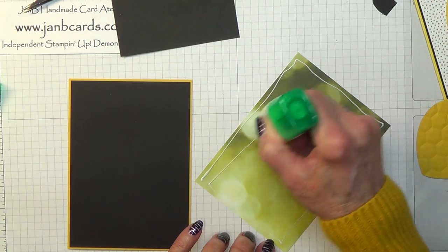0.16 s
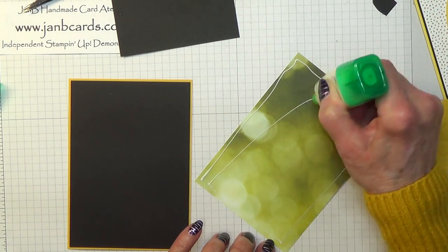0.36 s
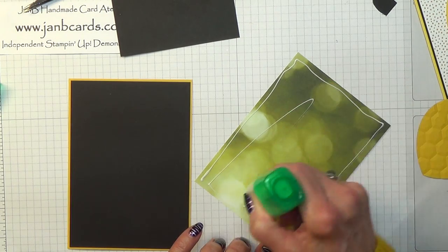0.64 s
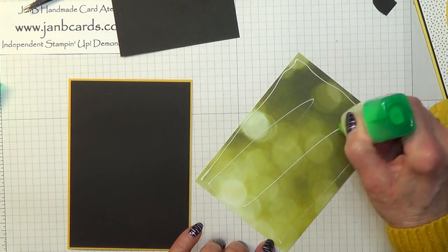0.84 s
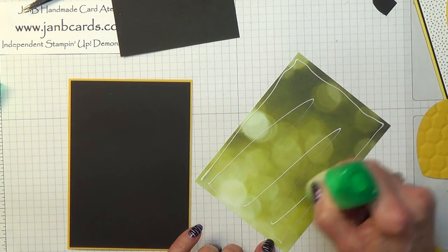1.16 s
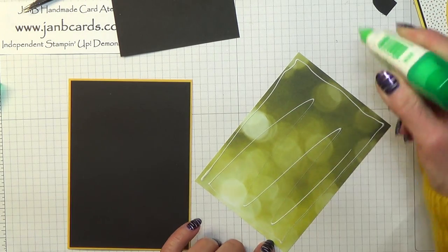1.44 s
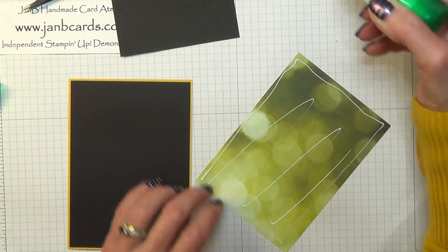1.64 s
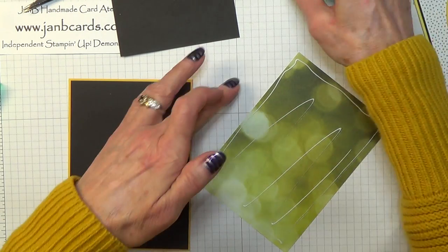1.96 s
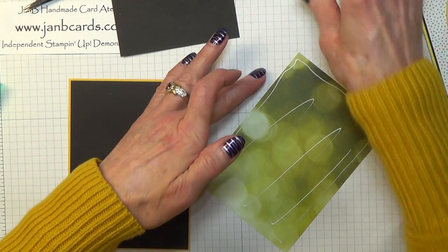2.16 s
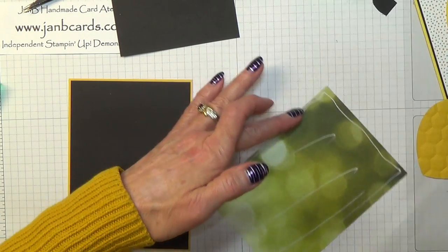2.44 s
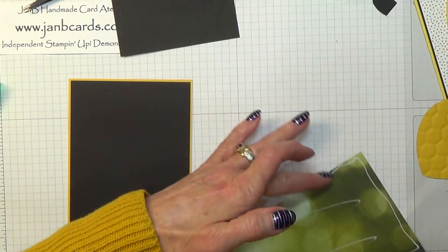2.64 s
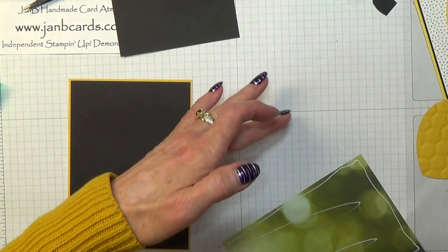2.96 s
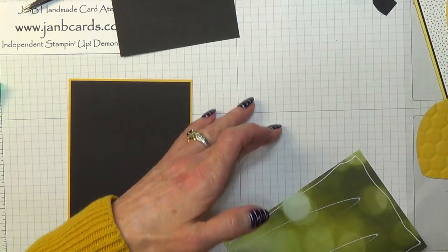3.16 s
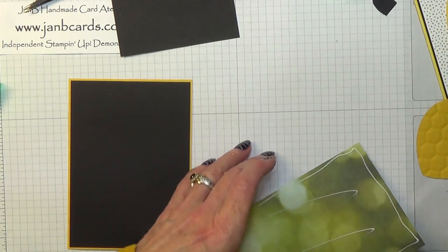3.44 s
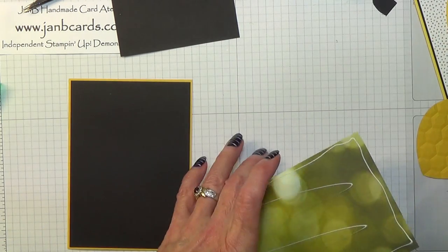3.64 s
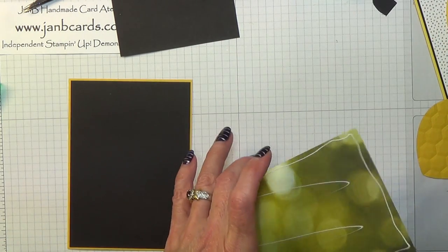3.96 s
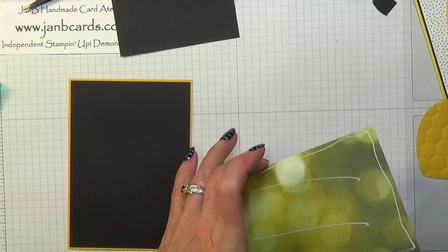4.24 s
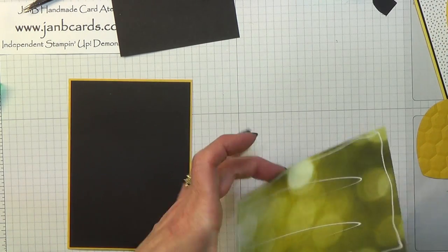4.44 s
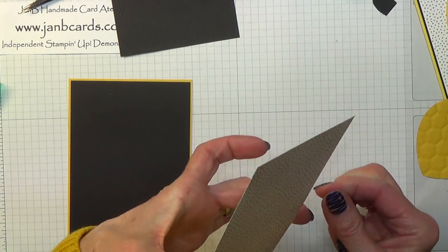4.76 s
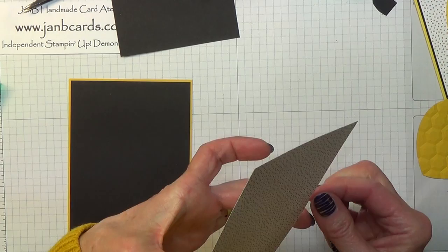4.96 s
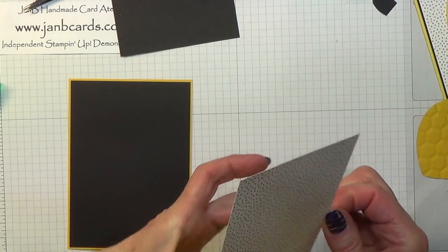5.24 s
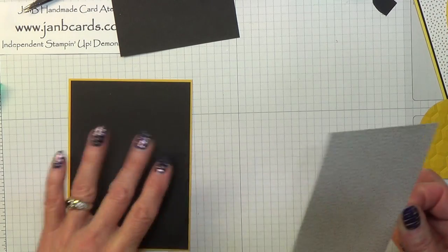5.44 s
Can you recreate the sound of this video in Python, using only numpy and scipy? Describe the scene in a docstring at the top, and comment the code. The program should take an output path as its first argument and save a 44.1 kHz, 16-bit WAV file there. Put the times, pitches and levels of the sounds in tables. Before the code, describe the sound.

A glue bottle nozzle scratches over card in five short strokes, then ticks, a sharp knock with a weaker bounce, and a hissing card slide.

```python
"""A glue bottle's nozzle is drawn over card in five strokes: tiny slips ring the bottle and rumble the table.
Light ticks follow, and a sharp knock with a weaker one after it is the bottle set down and rocking once.
The card then slides off the mat as hissing friction; short brushes and ticks are fingers and card edges.
A small room adds decaying reflections. The camera adds steady hiss, with mains hum and a faint pulsing whine."""
import sys
import numpy as np
from scipy import signal
from scipy.fft import rfft, irfft
from scipy.io import wavfile
from scipy.ndimage import uniform_filter1d

SR = 44100
rng = np.random.default_rng(int(sys.argv[2]) if len(sys.argv) > 2 else 0)


def inscribe(sig):
    """Save sig as 16-bit PCM at rate SR to the path in sys.argv[1].

    A 1-D sig is mono; a 2-D sig holds one channel per row.
    Samples are clipped to [-1, 1] before scaling.
    """
    pcm = np.round(np.clip(np.atleast_2d(sig).T, -1, 1) * 32767)
    wavfile.write(sys.argv[1], SR, pcm.astype(np.int16))


N = 246519
T = np.arange(N) / SR  # time of every sample, in seconds

# Nozzle strokes; the tip's angle favours one pitch in each:
# (start [s], speeding up [s], steady [s], slowing [s], base level [dB], extra table rumble [dB],
#  favoured pitch [Hz], pitch width [Hz], pitch against bottle ring [dB])
NOZZLE_STROKES = [(0.03, 0.13, 0.13, .13, -62, 3.5, 1900, 800, -17),
                  (0.43, 0.088, 0.022, 0.14, -53.5, 3.5, 2400, 330, -3.5),
                  (0.748, 0.027, 0.041, .11, -50.5, -2, 2200, 500, -2.5),
                  (0.919, 0.13, 0.02, 0.064, -51, 0.5, 3550, 650, -12),
                  (1.139, .13, 0.013, 0.026, -45.5, -2.5, 3660, 580, -3)]
# One push of the card over the mat: (start [s], speeding up [s], steady [s], slowing [s])
CARD_PUSH = (2.247, .2, 0.21, 0.098)
# Fingers and card edges brushing: (start [s], length [s], level before fading and room [dB], centre [Hz])
BRUSH_EVENTS = [(0.703, 0.033, -54.5, 12400), (1.373, 0.33, -59, 9900), (1.46, .024, -56, 11000),
                (2.212, 0.074, -63.5, 11000), (3.127, 0.094, -62.5, 9900), (3.27, 0.25, -66, 9000),
                (3.282, 0.25, -66.5, 2740), (3.528, .06, -65, 7000), (3.881, 0.056, -57.5, 6900),
                (3.93, 0.073, -63, 6000), (4.18, 0.083, -63.5, 2400), (4.267, 0.053, -62.5, 4470),
                (4.302, 0.031, -59.5, 1360), (5.303, 0.058, -61, 4170), (5.308, 0.057, -53, 9400)]
# Ticks of nails, plastic and card edges, and the sharp onsets of the bottle's knock and its bounce:
# (time [s], level before decay and room [dB], centre [Hz], time to fade by 60 dB [s])
TICK_EVENTS = [(0.748, -45.5, 10800, 0.054), (1.296, -39.5, 9000, 0.015), (1.451, -42, 11000, 0.021),
               (1.4512, -40, 1670, 0.0073), (1.4606, -30, 10000, 0.012), (1.493, -36, 10000, 0.011),
               (1.4993, -28, 9800, 0.0098), (1.5347, -25, 10900, 0.0079), (1.5663, -30.5, 9700, 0.0094),
               (1.5668, -35.5, 4350, 0.012), (1.75, -37.5, 4470, 0.0061), (2.0294, -23.5, 9400, 0.0023),
               (2.0934, -36.5, 5170, 0.011), (2.0934, -34, 1260, 0.011), (2.2205, -44.5, 12000, 0.01),
               (2.3061, -30, 9700, 0.0058), (3.772, -53, 2500, 0.012), (5.2431, -43.5, 10400, 0.033)]
# Blows on the table: (time [s], bottle ring gain [dB], table ring gain [dB], contact time [ms])
TABLE_BLOWS = [(1.075, -0.5, -5, 2.3), (1.097, -21, -8.5, 2.16), (2.0295, 6, 4.5, 0.068),
               (2.0921, -16, 5, 3.03), (5.25, -19, -16.5, 1.8)]
# Ringing of the bottle and the spot it lands on:
# (pitch [Hz], relative level [dB], time to fade by 60 dB [s])
BOTTLE_MODES = [(514, -22.5, 0.0098), (1360, -29, 0.021), (1900, -59, 0.0098), (3190, -15.5, 0.0087),
                (3610, -13, 0.0051), (4500, -17, 0.0044), (5200, -26, 0.0077), (6330, -23, 0.0069),
                (11100, -52, .004)]
# Ringing of the table top: (pitch [Hz], relative level [dB], time to fade by 60 dB [s])
TABLE_MODES = [(157, -46, 0.28), (205, -49, 0.26), (246, -55, 0.24), (250, -34, 0.038), (330, -38.5, 0.15),
               (400, -36, 0.13), (477, -32.5, 0.028), (572, -41, 0.11), (635, -40.5, 0.13),
               (817, -41.5, 0.07), (1270, -43, .12), (2470, -61, 0.11)]
# Nozzle and bottle resonances under friction: (centre [Hz], width [Hz], relative level [dB])
NOZZLE_RESONANCES = [(920, 480, -26), (1354, 65, 3.5), (1790, 210, -2.5), (2090, 250, -0.5),
                     (2740, 430, -3), (3660, 430, 1), (4870, 1900, -9.5)]

# Tone of the table's rumble under the nozzle: (frequency [Hz], relative level [dB])
RUMBLE_TONE = [(100, -26), (150, -8.5), (195, 5), (260, -2.5), (310, -8.5), (420, 2.5), (505, -8),
               (570, -2), (680, -7.5), (900, -13.5), (1300, -8.5), (3000, -44)]
# Tone of the card fibres' hiss under the nozzle: (frequency [Hz], relative level [dB])
FIBRE_TONE = [(3000, -15), (5500, 8), (7500, 7), (10000, 5.5), (13000, -1), (16000, -19)]
# Tone of the card's hiss on the mat: (frequency [Hz], relative level [dB])
CARD_TONE = [(2500, -18.5), (5000, -22), (7000, 3.5), (9000, 3), (12000, 2), (14000, -5), (16000, -15)]
# Tone of the card's rasp on the mat: (frequency [Hz], relative level [dB])
RASP_TONE = [(500, -29), (2000, -16), (3700, 3.5), (4600, -1), (6000, 5.5), (7500, -4), (10000, -18)]
# Tone of the room's reflections: (frequency [Hz], relative level [dB])
ROOM_TONE = [(100, 10), (200, 6), (450, 6), (750, 10.5), (920, 17), (1100, 11), (1300, -1), (1750, 13),
             (2500, 10), (3200, -2), (5000, -0.5), (9000, -4), (16000, 1)]
# Tone of the steady hiss: (frequency [Hz], relative level [dB])
HISS_TONE = [(25, -12), (45, -13), (70, -3.5), (120, 0.5), (250, 1.5), (450, -2.5), (650, -4), (1150, -5.5),
             (1420, -0.5), (1750, -7), (4000, -9.5), (8000, -12), (12500, -12.5), (16000, -16.5)]
# Mains hum, before it is leaned to one side: (pitch [Hz], rms level [dB])
HUM_TONES = [(50, -76), (100, -66.5), (150, -75.5), (200, -69), (250, -78.5), (300, -84), (400, -83.5),
             (500, -84)]
# Stereo width of the diffuse sound, nearly mono at the very top: (frequency [Hz], side gain [dB])
STEREO_WIDTH = [(60, 6), (200, -8), (400, -8), (700, -10), (1300, -12.5), (2400, -16.5), (4400, -20),
                (8100, -6), (15000, -28)]

# Each layer's amplitude is the rubbing speed raised to its own power
SCRATCH_POWER, RUMBLE_POWER, FIBRE_POWER, CARD_POWER, RASP_POWER = 1.3, 0.72, 0.98, 1.76, 0.77
BRIGHTEN_DB = 3  # rise of the fibre hiss from the start of a stroke to its end
# The sliding card's edge catches once: it presses harder and sings
CATCH_S, CATCH_WIDTH_S, CATCH_DB = 2.601, 0.025, 3
SING_HZ, SING_WIDTH_HZ = 6240, 1600
HISS_DB = -59.5
TOP_HZ = 15900  # the camera passes little above this


def undb(db):
    """Turn decibels into a gain."""
    return 10 ** (np.asarray(db) / 20)


def unit(x):
    """Scale a sound to an rms level of 1."""
    return x / np.sqrt(np.mean(x ** 2))


def add(track, start_s, sound):
    """Mix a sound into a track at a given time."""
    i = int(start_s * SR)
    track[i:i + len(sound)] += sound[:N - i]


def colour(x, tone):
    """Shape a sound's spectrum through (Hz, dB) points, joined along a log pitch scale."""
    hz, db = np.transpose(tone)
    f = np.fft.rfftfreq(x.shape[-1], 1 / SR)
    gain = undb(np.interp(np.log(f + 1), np.log(hz), db))
    return irfft(rfft(x) * gain, x.shape[-1])


def resonate(x, hz, width):
    """Let one resonance ring, with gain 1 at its centre."""
    hz = min(hz, 0.45 * SR)
    sharpness = hz / min(width, SR / 3)
    b, a = signal.iirpeak(hz, sharpness, SR)
    return signal.lfilter(b, a, x)


def fade(t, t60):
    """A natural decay that falls by 60 dB in t60 seconds."""
    return np.exp(-np.log(1000) * t / t60)


def spread(mid, side):
    """Make diffuse sound stereo: the mid is alike in both channels, the shaped side is opposed."""
    side = colour(side, STEREO_WIDTH)
    return mid + np.array([side, -side])


def pan(x, left_db):
    """Make the left channel louder than the right by left_db."""
    return x * undb(np.array([[left_db], [-left_db]]) / 2)


def room(x, wet_db, t60, side_db, first_s=0.00146):
    """Table and near walls send back dense reflections: fading noise that starts after first_s."""
    t = T[:SR // 2]
    tail = colour(rng.standard_normal((2, len(t))), ROOM_TONE) * fade(t, t60) * (t > first_s)
    mid, side = (signal.fftconvolve(x, echo / np.linalg.norm(echo))[:N] for echo in tail)
    return x + undb(wet_db) * spread(mid, undb(side_db) * side)


def steady_hiss():
    """The camera's own hiss: shaped random noise in both channels."""
    mid, side = (unit(colour(noise, HISS_TONE)) for noise in rng.standard_normal((2, N)))
    return undb(HISS_DB) * spread(mid, side)


def mains_hum():
    """Mains hum: steady sine tones at multiples of 50 Hz."""
    hum = np.zeros(N)
    for hz, db in HUM_TONES:
        hum += np.sqrt(2) * undb(db) * np.sin(2 * np.pi * (hz * T + rng.random()))
    return pan(hum, left_db=-3.5)


def whine(hz=2650, scatter=0.024, db=-68, first_s=0.0367, pulse_s=0.0053):
    """A faint electronic pip 25 times a second, each at a slightly different pitch."""
    period = 1 / 25
    # number of the pip and time within its period; pips peak mid-period, one of them at first_s
    pip, since = np.divmod(T - first_s + 3 * period / 2, period)
    pip_pitch = hz * (1 + scatter * rng.standard_normal(int(pip[-1]) + 1))
    pitch = pip_pitch[pip.astype(int)]
    swell = np.exp(-((since - period / 2) / pulse_s) ** 2)
    return undb(db) * swell * np.sqrt(2) * np.sin(2 * np.pi * pitch * since)


def background():
    """Steady hiss, mains hum and the pulsing whine together."""
    return steady_hiss() + mains_hum() + whine()


def friction(rate, spread_db):
    """Fibres catch and let go: tiny slips of uneven size, on average rate of them a second."""
    slips = rng.random(N) < rate / SR
    direction = rng.choice([-1, 1], N)
    return unit(slips * direction * undb(spread_db * rng.standard_normal(N)))


def speed(start, attack, hold, release):
    """A hand movement from 0 to 1 and back: it speeds up, holds and slows."""
    return np.interp(T, start + np.cumsum([0, attack, hold, release]), [0, 1, 1, 0])


def drag(depth_db):
    """The grip on paper wavers from moment to moment: a smoothed random gain."""
    wander = rng.standard_normal(N)
    for _ in range(2):
        wander = uniform_filter1d(wander, size=500)
    return undb(depth_db * unit(wander))


def brushes(width_share=0.65):
    """Skin on card: short swells of friction, each in a band whose width is a share of its centre."""
    out, slips = np.zeros(N), friction(rate=8000, spread_db=4)
    for start, length, db, hz in BRUSH_EVENTS:
        rub = slips[int(start * SR):][:int(length * SR)]
        swell = signal.windows.tukey(len(rub), 0.6)
        add(out, start, undb(db) * unit(resonate(rub, hz, width_share * hz)) * swell)
    return out


def ticks(width_share=0.45):
    """Hard contacts and knock onsets: quickly fading cracks in bands whose width is a share of the centre."""
    out, t = np.zeros(N), T[:SR // 10]
    for start, db, hz, t60 in TICK_EVENTS:
        crack = unit(resonate(rng.choice([-1., 1.], len(t)), hz, width_share * hz))
        add(out, start, undb(db) * crack * fade(t, t60))
    return out


def slide(hiss_db=-46.0, rasp_db=-58.0, sing_db=-48.5, snag_db=-57, uneven_db=1.0):
    """The card hisses and rasps over the mat with tiny snags; it swells where its edge catches and sings."""
    v = speed(*CARD_PUSH)
    catch = np.exp(-((T - CATCH_S) / CATCH_WIDTH_S) ** 2)
    edge = friction(rate=14000, spread_db=3)
    face = friction(rate=30000, spread_db=2)
    burrs = friction(rate=18, spread_db=3)
    hiss = undb(hiss_db) * v ** CARD_POWER * unit(colour(face, CARD_TONE))
    rasp = undb(rasp_db) * v ** RASP_POWER * unit(colour(edge, RASP_TONE))
    sing = undb(sing_db) * catch * unit(resonate(edge, SING_HZ, SING_WIDTH_HZ))
    snags = undb(snag_db) * v ** CARD_POWER * unit(colour(burrs, CARD_TONE))
    return drag(uneven_db) * (undb(CATCH_DB * catch) * (hiss + rasp) + sing + snags)


def ring(modes, phases):
    """A struck body rings at several pitches, each fading at its own rate, for half a second."""
    t = T[:SR // 2]
    out = np.zeros(len(t))
    for (hz, db, t60), phase in zip(modes, phases):
        out += undb(db - 60 * t / t60) * np.sin(2 * np.pi * (hz * t + phase))
    return out


def radiate(x, hz, order):
    """A body gives off little sound below its first mode."""
    return signal.sosfilt(signal.butter(order, hz, "high", fs=SR, output="sos"), x)


def knocks(spread_s=0.002, build_s=0.00015):
    """Each blow rings bottle and table; a longer, softer contact leaves only the low modes."""
    bottle, table = np.zeros((2, N))
    t = T[:SR // 2]
    clack = ring(BOTTLE_MODES, np.zeros(len(BOTTLE_MODES))) * (1 - np.exp(-t / build_s))
    for start, bottle_db, table_db, contact_ms in TABLE_BLOWS:
        # the force of the blow rises and falls as half a sine wave
        push = np.sin(np.pi * np.minimum(T[1:SR // 100] / (contact_ms / 1000), 1))
        push = push / push.sum()
        # bending waves need a moment to cross the table, so its modes start out of step
        boom = ring(TABLE_MODES, rng.random(len(TABLE_MODES))) * (1 - np.exp(-t / spread_s))
        add(bottle, start, undb(bottle_db) * np.convolve(clack, push))
        add(table, start, undb(table_db) * np.convolve(boom, push))
    return radiate(bottle, hz=244, order=2), radiate(table, hz=128, order=4)


def nozzle(rumble_db=-1, fibre_db=-7, uneven_db=1.5):
    """The tip slips over the fibres: the bottle rings, the table rumbles under it, the card hisses."""
    slips = friction(rate=4000, spread_db=4.0)
    bottle = np.zeros(N)
    for k, (hz, width, db) in enumerate(NOZZLE_RESONANCES):
        bottle += (-1) ** k * undb(db) * resonate(slips, hz, width)  # neighbours have opposite signs
    bottle = unit(bottle)
    table = unit(colour(slips, RUMBLE_TONE))
    fibres = unit(colour(friction(rate=4400, spread_db=1.5), FIBRE_TONE))
    out = np.zeros(N)
    for start, attack, hold, release, db, table_db, hz, width, bite_db in NOZZLE_STROKES:
        v = speed(start, attack, hold, release)
        # the pitch favoured by the tip's angle
        bite = undb(bite_db) * unit(resonate(rng.standard_normal(N), hz, width))
        out += undb(db) * v ** SCRATCH_POWER * unit(bottle + bite)
        out += undb(db + rumble_db + table_db) * v ** RUMBLE_POWER * table
        progress = np.clip((T - start) / (attack + hold + release), 0, 1)
        hiss_db = db + fibre_db + BRIGHTEN_DB * (progress - 0.5)
        out += undb(hiss_db) * v ** FIBRE_POWER * fibres
    return out * drag(uneven_db)


def scene():
    """Strokes, handling and knocks in one small room, over the background."""
    bottle, table = knocks()
    clicks = pan(room(ticks(), wet_db=-6.0, t60=0.16, side_db=-9), left_db=-2.0)
    card = pan(room(slide() + brushes(), wet_db=-7.5, t60=0.37, side_db=2), left_db=-1.0)
    clack = pan(room(bottle, wet_db=-7.0, t60=0.18, side_db=-11.0), left_db=1.3)
    boom = pan(room(table, wet_db=-12.5, t60=0.17, side_db=-7.0), left_db=-4.0)
    strokes = pan(room(nozzle(), wet_db=-9.5, t60=0.26, side_db=-1.5), left_db=-0.6)
    return background() + clicks + card + clack + boom + strokes


def record(dry):
    """The camera cuts the highest treble with a steep filter."""
    return signal.sosfilt(signal.ellip(10, 0.2, 70, TOP_HZ, fs=SR, output="sos"), dry)


dry = scene()
out = record(dry)
inscribe(out)
```